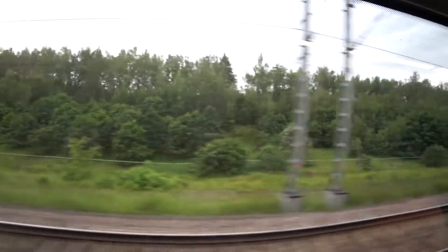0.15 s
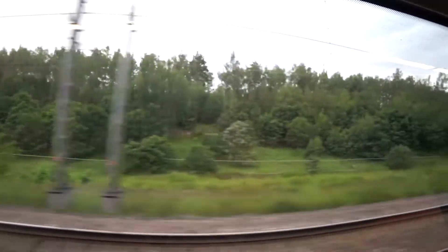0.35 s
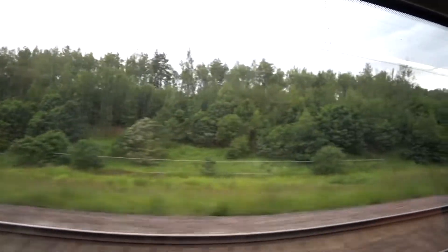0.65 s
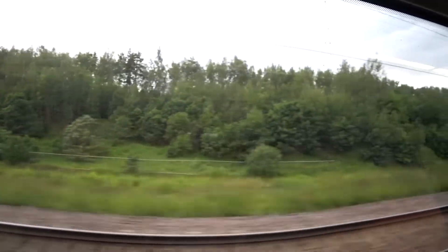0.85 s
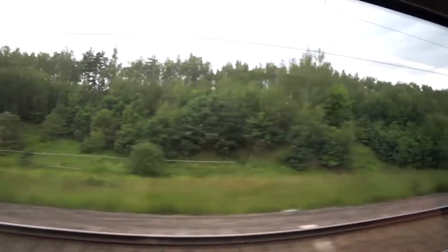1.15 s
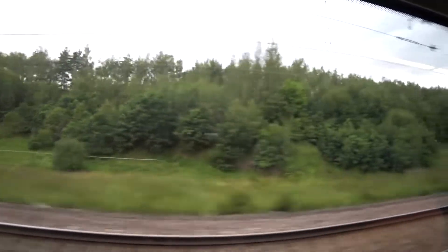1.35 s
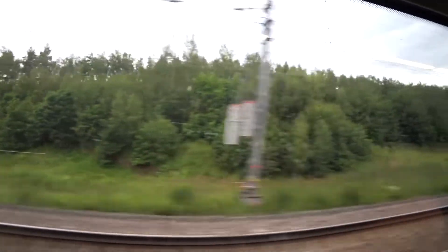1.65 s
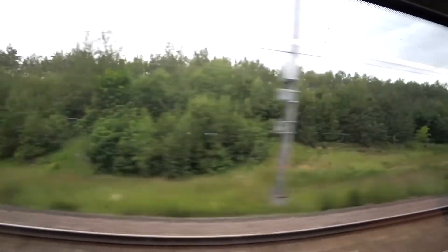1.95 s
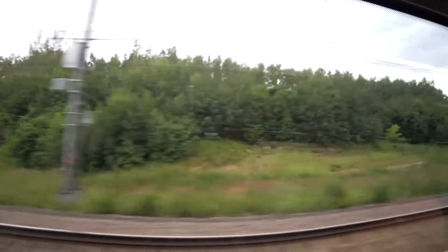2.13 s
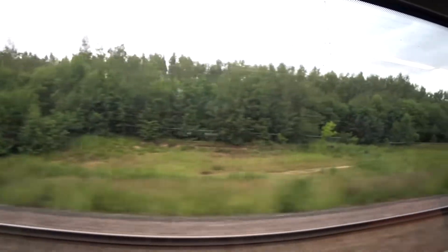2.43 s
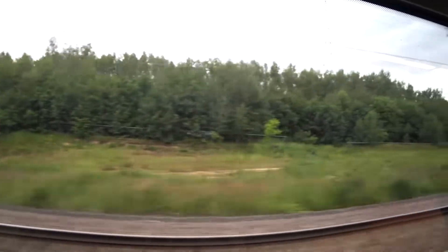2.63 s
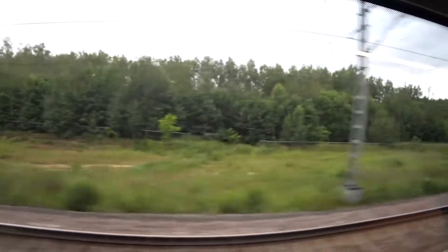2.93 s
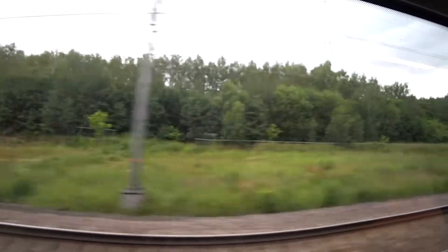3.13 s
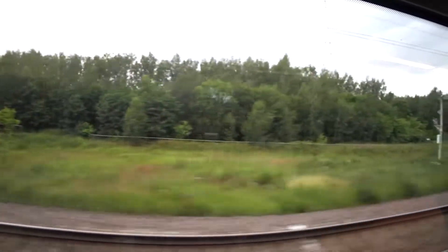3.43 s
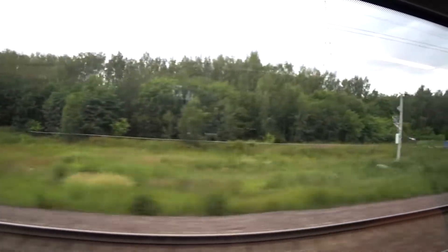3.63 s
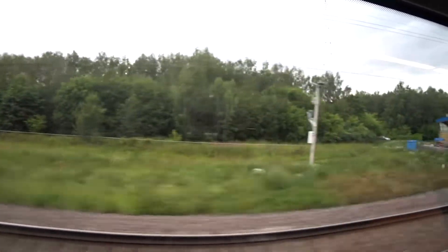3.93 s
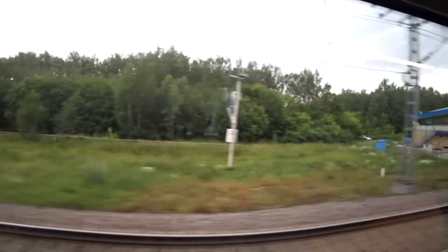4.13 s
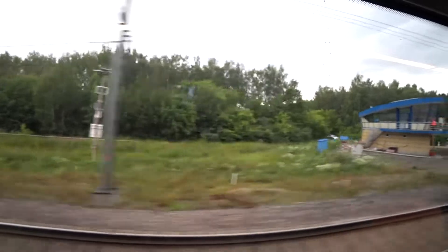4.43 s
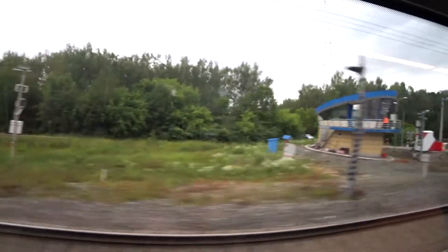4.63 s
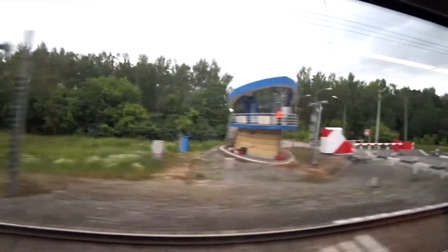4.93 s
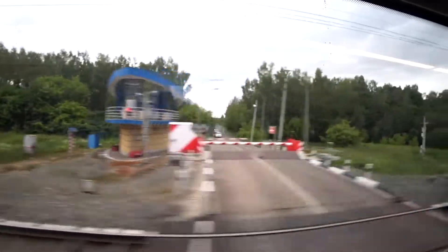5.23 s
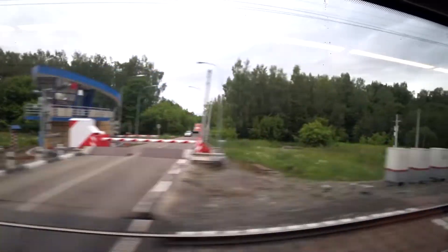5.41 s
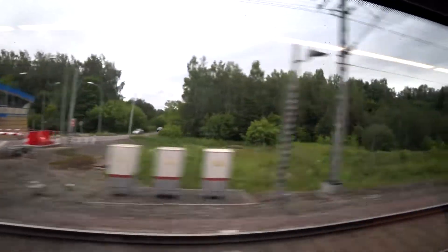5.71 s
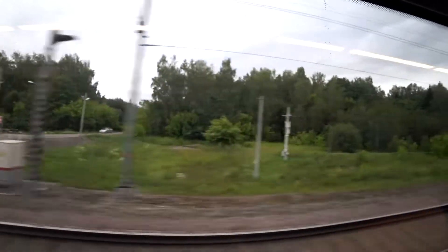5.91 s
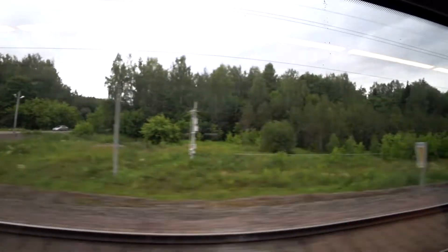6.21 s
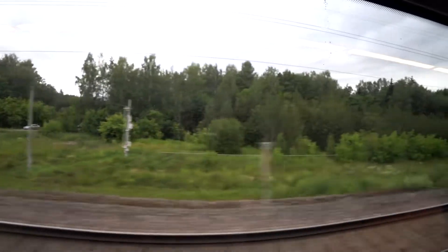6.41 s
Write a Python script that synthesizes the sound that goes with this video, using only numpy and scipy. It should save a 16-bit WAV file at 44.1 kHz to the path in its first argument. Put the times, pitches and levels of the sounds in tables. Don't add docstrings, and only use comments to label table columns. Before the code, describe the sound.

A train runs fast past woods and then a level crossing, heard from the passenger interior. Deep rolling roar and body boom dominate, rising and falling with the rail. Ventilation hisses smoothly, luggage rustles faintly, plastic trim creaks and ticks. Two quick metallic chatters come in the first two seconds; later, from about four seconds, the rumble surges with stronger floor thuds. Close, wide stereo, short interior reverberation.

```python
import sys
import numpy as np
from scipy import signal
from scipy.fft import rfft, irfft, next_fast_len
from scipy.io import wavfile
from scipy.ndimage import uniform_filter1d, map_coordinates

SR = 44100
rng = np.random.default_rng(int(sys.argv[2]) if len(sys.argv) > 2 else 0)


def gain_from_db(level_db):
    decades = np.asarray(level_db, float) / 20
    return 10 ** decades


def transcribe(u):
    v = np.clip(np.atleast_2d(u).T, -1, 1)
    q = np.round(v * 32767).astype(np.int16)
    wavfile.write(sys.argv[1], SR, q)


N = 289283
BURST_T = np.arange(SR // 3) / SR

# frequency in Hz, width in Hz, level in dB.
CABIN_MODES = [(23.7, 13.4, 4), (43, 32, 2), (57.6, 7.6, -4), (68, 14.8, 5)]
# frequency in Hz, width in Hz, level in dB.
SHELL_MODES = [(107.6, 16.2, 0), (131, 30, -2), (176, 51, -6.5), (213.6, 8.4, -7.5)]
# frequency in Hz, width in Hz, level in dB.
FLOOR_MODES = [(254, 57, -19), (297, 55, 1), (345, 26, 2.5), (400, 55, -4)]
# frequency in Hz, width in Hz, level in dB.
SMALL_FLOOR_MODES = [(463, 56, 3), (558, 16, -6), (595, 36, -2.5), (780, 150, -12), (880, 200, -36)]
# frequency in Hz, width in Hz, level in dB.
RAIL_MODES = [(740, 250, -2), (849, 200, -1.5), (1007, 170, -2), (1130, 280, -6.5), (1460, 520, -12.5)]
# time in seconds, level in dB.
SWAY_LEVEL = [(0.0, -21), (0.51, -24.5), (1.55, -20), (1.59, -31), (1.64, -15.5), (1.77, -23),
              (2.56, -20.5), (2.72, -22), (3.51, -23.5), (3.65, -25), (4.16, -23.5), (4.35, -17),
              (4.51, -25.5), (4.53, -20), (5.17, -20.5), (5.24, -19.5), (5.26, -19), (6.56, -19)]
SMOOTH_DB = -41
# centre in seconds, level in dB, length in seconds,
# long ripples in dB, short ripples in dB.
ROUGH_PATCHES = [(0.07, -50.5, 0.49, 7, 2), (0.517, -39.5, .12, 2, -1), (0.923, -33, 0.079, 0, -6),
                 (1.12, -42, 0.11, 4, -8), (1.337, -36, 0.072, 1, -7), (1.477, -35, 0.03, -.5, -11),
                 (1.539, -31.5, 0.031, -2, -9), (1.634, -36.5, 0.05, 3, -6), (1.736, -49, 0.022, 7.5, -6),
                 (2.07, -39, 0.083, -0.5, -1), (2.235, -42, 0.091, -5, -1), (2.49, -45, 0.06, 3.5, 7),
                 (2.6, -37.5, 0.051, -6, 0), (2.72, -40, 0.21, 0.5, 1.5), (2.85, -51, .06, 5, -1),
                 (3.163, -38, 0.09, 2.5, -4), (3.477, -42, 0.24, 0, 2.5), (3.783, -34.5, .1, -8, -0.5),
                 (3.916, -35, .1, -5.5, -1), (4.054, -37, 0.13, -6.5, -1), (4.147, -34.5, 0.038, 2.5, 3.5),
                 (4.305, -28.5, 0.098, 0.5, 2.5), (4.577, -32, 0.12, 0, 0), (4.684, -26, 0.16, -1, -2),
                 (4.798, -34, 0.031, -1, -5), (4.952, -27, 0.12, 1, -1.5), (5.134, -32.5, 0.028, -1.5, 1),
                 (5.23, -26.5, 0.1, 1, -5), (5.385, -27, 0.12, -0.5, -1.5), (5.523, -32.5, 0.068, -2, 1),
                 (5.717, -31, 0.099, 1, -1.5), (5.817, -25.5, 0.16, -0.5, -9), (5.954, -33, 0.12, 1.5, -6),
                 (6.1, -32, 0.08, 4, -2), (6.25, -30, 0.11, 0.5, 0), (6.5, -33.5, 0.24, 3.5, -6)]
# time in seconds, level in dB.
VENT_LEVEL = [(0.0, -52.5), (0.8, -53), (1.28, -53), (1.97, -53), (2.59, -51.5), (2.9, -53), (3.21, -53.5),
              (3.6, -50), (4.66, -52), (4.79, -50.5), (5.46, -51), (6.56, -52.5)]
# frequency in Hz, level per Hz in dB.
VENT_COLOUR = [(700, -26), (1300, 4), (1650, 1), (2200, -3.5), (3000, -6), (3900, -6.5), (4800, -14),
               (6000, -24), (7500, -36), (11000, -62)]
# frequency in Hz, width in Hz, level in dB.
FAN_LINES = [(810, 9.2, -2.5), (1113, 10, -4.5), (2654, 13, -17), (3240, 4.6, -37)]
# centre in seconds, level in dB, length in seconds.
LUGGAGE_SHIFTS = [(.45, -66.5, 0.33), (2.4, -66, 0.15), (2.64, -54.5, 0.14), (3.4, -64.5, 0.29),
                  (3.92, -57, 0.21), (4.15, -69, 0.092), (4.33, -55, 0.19), (4.7, -62, 0.16),
                  (4.86, -54, 0.25), (5.4, -59.5, 0.18), (2.15, -65.5, 0.28), (5.9, -65.5, 0.5),
                  (6.1, -63, 0.18), (6.45, -58, .2)]
# frequency in Hz, level per Hz in dB.
RUSTLE_COLOUR = [(2500, -27), (4500, 1), (5600, -2), (6900, 1), (7900, -5), (9000, -7), (10200, -6.5),
                 (11500, -10.5)]
# centre in seconds, level in dB, frequency in Hz, length in seconds.
MODE_HUMS = [(0.076, -14, 22.07, 0.36), (0.352, -18.5, 22.95, 0.17), (0.893, -29.5, 340, 0.038),
             (0.97, -32, 463, 0.03), (1.086, -30, 365.4, 0.029), (1.586, -35, 347, 0.076),
             (2.023, -38, 805, 0.032), (2.102, -30, 345, 0.062), (1.66, -17, 63.2, 0.13),
             (3.462, -16.5, 41.85, 0.18), (4.856, -11, 68, 0.052), (5.342, -11.5, 67.9, 0.077),
             (5.927, -18.5, 131.3, 0.3), (6.03, -21, 68, 0.47), (5.951, -20.5, 453, 0.022),
             (6.373, -13.5, 131, 0.025), (6.47, -31, 336.8, 0.49), (0.083, -24, 181, 0.046),
             (0.644, -41, 561, 0.031), (0.908, -39.5, 205, 0.046), (1.549, -35, 450, .025),
             (1.784, -31.5, 190.5, 0.24), (4.39, -20, 149, 0.051), (5.03, -28, 347, 0.036),
             (5.744, -25, 199.4, 0.086)]
# start in seconds, peak in dB, top part in dB, T60 in seconds.
TRIM_SLIPS = [(.8594, -56, -14.5, 0.11), (2.4104, -45.5, -6, 0.12), (2.4698, -46.5, -3.5, 0.17),
              (2.509, -33.5, -9, .13), (3.1094, -49, -33, 0.11), (3.2819, -48.5, -6, 0.068),
              (3.381, -37, -6, 0.051), (3.388, -31.5, -9.5, 0.065), (3.4, -40, -11, 0.09),
              (3.548, -37, -7, 0.11), (3.7698, -43, -31, 0.11), (4.1084, -52, -1, .18),
              (4.3485, -40, -11, 0.05), (4.809, -41, -30, 0.051), (4.853, -36, -12, 0.11),
              (5.5303, -46, -30, .17), (6.4244, -45.5, -6, 0.079)]
# start in seconds, peak in dB, top part in dB, T60 in seconds.
STRAP_SLIPS = [(.182, -42.5, -11, 0.15), (.4594, -49, -6, 0.15), (1.4311, -47, -22, 0.065),
               (1.5459, -43.5, -14, 0.11), (2.795, -46.5, -19, 0.098), (3.4144, -44, -18, .097),
               (3.6994, -47, -34, 0.056), (3.9724, -35.5, -10, 0.072), (3.9914, -53, -15, 0.12),
               (4.1969, -41, -9, 0.059), (4.2423, -42, -12, 0.17), (4.369, -34.5, -11, 0.11),
               (4.9866, -45, -2, 0.12), (5.2021, -43, -4, 0.12), (5.2939, -46, -26, .12),
               (5.437, -38, -7.5, 0.056)]
# start in seconds, peak in dB, top part in dB, T60 in seconds.
PANEL_SLIPS = [
    (.9193, -57, -41, 0.078),
    (1.9445, -50, -8, 0.23),
    (2.348, -43.5, -22, 0.055),
    (4.6463, -44, -11, 0.36),
    (5.0878, -46, -27, 0.15),
    (5.7568, -54, -20, .14),
    (6.2253, -37, -17, 0.043),
    (6.236, -38, -18, .08),
    (6.2464, -48, -18, 0.14),
]
TRIM_LOW_DB, STRAP_LOW_DB, PANEL_LOW_DB = 3, -0.5, 9.5
# start in seconds, level in dB, frequency in Hz, T60 in seconds.
PART_TICKS = [(.182, -44, 6940, 0.075), (.422, -48, 4360, .02), (.528, -43.5, 3800, .02),
              (2.322, -57, 7100, .03), (4.11, -41.5, 3600, .02), (4.482, -51, 7030, 0.066),
              (4.745, -41, 4000, 0.065), (4.812, -41, 5470, 0.02), (4.815, -44, 2960, 0.078),
              (4.991, -47, 3260, 0.047), (5.24, -37, 3760, 0.02), (5.314, -41, 4730, .02),
              (5.358, -56, 8400, 0.077), (5.392, -70, 8460, .07), (5.555, -54, 3700, .03),
              (5.757, -43, 3670, .018), (5.828, -53, 5000, .018), (5.84, -59, 8300, .12),
              (6.353, -37.5, 3900, .018)]
# start in seconds, level in dB, small panels in dB, T60 in seconds.
RAIL_DIPS = [(.637, -42, -3, 0.065), (.9, -38, -3, 0.11), (.92, -35.5, -1, 0.13), (1.455, -33, -10, 0.12),
             (1.536, -28, -5, .1), (2.039, -36.5, -8, .1), (2.599, -43, 0, 0.078), (4.196, -40, 3, 0.048),
             (4.291, -30, 7, 0.077), (4.541, -32, 0, .1), (4.635, -40, 1, 0.1), (4.729, -37, -3, .1),
             (5.031, -41, -6, .08), (5.199, -37, 0, 0.093), (5.674, -39, 0, 0.065), (5.78, -31, 7, 0.089),
             (5.937, -30, 4, 0.085), (6.269, -24, 3, 0.072)]
# start in seconds, level in dB, brightness in dB.
FITTING_CONTACTS = [(1.195, -40.5, 2), (1.208, -49, 7), (1.219, -39, 5), (1.231, -39, 4.5), (1.243, -47, 6),
                    (1.262, -52, 0), (1.669, -35, 0), (1.684, -32, 1), (1.7, -49, 0), (1.721, -49, 5),
                    (1.745, -52, 0)]
# start in seconds, level in dB, frequency in Hz, T60 in seconds.
FITTING_NOTES = [(1.197, -57, 3900, .06), (1.212, -54, 7200, .07), (1.218, -51, 2560, .08),
                 (1.221, -53, 6730, .2), (1.225, -52, 5080, .2), (1.229, -44, 3220, .12),
                 (1.232, -48, 2030, .06), (1.255, -59, 5150, .2), (1.669, -40, 2520, .1),
                 (1.671, -36, 3420, .07), (1.682, -54, 8250, .08), (1.682, -34, 2070, 0.096),
                 (1.684, -33.5, 2543, 0.066), (1.684, -37, 3180, 0.13), (1.684, -54, 6530, .06),
                 (1.693, -52, 5130, .12), (1.7, -44, 3200, .12), (1.718, -47.5, 2500, 0.19),
                 (1.722, -44, 3200, 0.15)]
# frequency in Hz, width in Hz, level in dB.
FITTING_LOW_MODES = [(1750, 300, -4), (2040, 240, -4), (2500, 390, -1), (2840, 300, -6), (3200, 300, -2),
                     (3500, 330, -6), (4050, 440, -11), (4570, 360, -21)]
# frequency in Hz, width in Hz, level in dB.
FITTING_HIGH_MODES = [(5000, 170, 3), (5700, 500, -5), (6620, 120, -1.5), (7200, 250, -5), (8150, 360, -8),
                      (9500, 600, -16)]
# frequency in Hz, T60 in seconds.
CAR_DECAY = [(1000, 0.41), (4000, 0.54), (10000, 0.4)]
# frequency in Hz, likeness from 0 to 1.
LIKENESS = [(25, .99), (150, .98), (270, .87), (500, .8), (850, .55), (1400, .64), (2000, .47), (3500, .57),
            (6000, .68), (10000, .54)]
# frequency in Hz, left over right in dB.
PORT_LEAN = [(25, 2.7), (100, 1.5), (400, .3), (900, -1.1), (1400, -2.8), (1800, -.4), (4000, -1.6),
             (10500, -1.8)]
# frequency in Hz, lead of the left in radians.
PORT_LEAD = [(10, .3), (27, .5), (60, .9), (170, 1.5), (420, 1.12), (700, 1.3), (1150, 1.1), (1800, .15),
             (2500, 0)]


def unit(x):
    return x / np.sqrt(np.mean(x ** 2) + 1e-20)


def along(points, hz):
    f, value = np.transpose(points)
    return np.interp(np.log(hz + 1), np.log(f + 1), value)


def level_curve(rows):
    s, db = np.transpose(rows)
    return np.interp(np.arange(N) / SR, s, db)


def wobble(rate):
    knots = rng.standard_normal(int(N * rate / SR) + 4)
    return map_coordinates(knots, [np.arange(N) * rate / SR])


def bell(s, length):
    return np.exp(-2 * ((np.arange(N) / SR - s) / length) ** 2)


def swells(rows, floor_db):
    power = sum(gain_from_db(db) ** 2 * bell(s, length) for s, db, length in rows)
    return 10 * np.log10(gain_from_db(floor_db) ** 2 + power)


def filtered(x, response):
    edge = SR // 8
    size = next_fast_len(N + 2 * edge)
    wide = np.pad(x, [(0, 0), (edge, edge)], "reflect")
    spectrum = rfft(wide, size) * response(np.fft.rfftfreq(size, 1 / SR))
    return irfft(spectrum, size)[:, edge:edge + N]


def modes(rows, order=1, top_hz=20000):
    def gain(hz):
        f = hz + 1e-3
        power = 0
        for centre, width, db in rows:
            peak = f * width / (centre * centre - f * f + 1j * f * width)
            power = power + gain_from_db(db) ** 2 * np.abs(peak) ** (2 * order)
        return np.sqrt(power) / (1 + (hz / top_hz) ** 4)
    return gain


def diffuse(response, patchy_db=0):
    z = signal.stft(rng.standard_normal((2, N)), nperseg=512)[2]
    patches = uniform_filter1d(rng.standard_normal(z.shape[1:]), 6, 0)
    patches = unit(uniform_filter1d(patches, 10, 1))
    pair = signal.istft(z * gain_from_db(patchy_db * patches), nperseg=512)[1][:, :N]

    def mid_side(hz):
        angle = np.arccos(np.clip(along(LIKENESS, hz), -1, 1)) / 2
        return response(hz) * [np.cos(angle), np.sin(angle)]
    mid, side = filtered(pair, mid_side)
    return unit(np.array([mid + side, mid - side]))


def grit(response):
    noise = rng.standard_normal(N) + 0.84 * rng.standard_normal((2, N))
    return unit(filtered(noise, response))


def steadied(x, seconds, share):
    swell = np.abs(uniform_filter1d(np.mean(x ** 2, 0), int(seconds * SR))) + 1e-6
    return unit(x * swell ** (-share / 2))


def puff(db, t60, rise):
    fall = gain_from_db(db - 60 * BURST_T / max(t60, 0.02))
    return fall * (1 - np.exp(-BURST_T / rise)) ** 2


def tone(hz, phase=0):
    return np.sin(2 * np.pi * hz * BURST_T + phase)


def add(track, s, burst):
    track[..., round(s * SR):][..., :burst.shape[-1]] += burst


def roughness(long_share=0, short_share=0):
    rows = [(s, db + long_share * long_db + short_share * short_db, length)
            for s, db, length, long_db, short_db in ROUGH_PATCHES]
    return swells(rows, SMOOTH_DB) - SMOOTH_DB


def rolling():
    sway_db = level_curve(SWAY_LEVEL) + 0.55 + 0.77 * wobble(16)
    boom_db = -28.5 + 0.5 * roughness(long_share=1.9) + 1.58 * wobble(9)
    roll_db = SMOOTH_DB + roughness(long_share=0.36) - 0.46
    drum_db = SMOOTH_DB + roughness(short_share=0.2) - 3.0
    rail_db = -46 + 0.42 * roughness(short_share=2.4) + 0.5 * wobble(5.7)

    air = diffuse(modes(CABIN_MODES, top_hz=93))
    shell = diffuse(modes(SHELL_MODES, top_hz=254))
    floor = diffuse(modes(FLOOR_MODES, top_hz=970), patchy_db=0.66)
    small = diffuse(modes(SMALL_FLOOR_MODES, top_hz=970), patchy_db=1.2)
    rail = diffuse(modes(RAIL_MODES, order=2), patchy_db=1.36)

    roar = gain_from_db(sway_db) * steadied(air, 0.17, share=0.47)
    roar += gain_from_db(boom_db) * steadied(shell, 0.096, share=1.0)
    roar += gain_from_db(roll_db) * steadied(floor, 0.12, share=0.52)
    roar += gain_from_db(drum_db) * steadied(small, 0.15, share=0.6)
    roar += gain_from_db(rail_db) * steadied(rail, 0.069, share=0.6)
    return filtered(roar, lambda hz: 1 / (1 + (hz / 2000) ** 4))


def ventilation():
    air_db = level_curve(VENT_LEVEL) + 4.0 + 0.17 * roughness(short_share=1.7) + 0.45 * wobble(7.8)
    hiss = diffuse(lambda hz: gain_from_db(along(VENT_COLOUR, hz)), patchy_db=0.93)
    return gain_from_db(air_db) * hiss + gain_from_db(-54.5) * diffuse(modes(FAN_LINES, order=2))


def luggage():
    rustle_db = swells(LUGGAGE_SHIFTS, floor_db=-65.5) + 2.0 + 1.7 * wobble(30)
    return gain_from_db(rustle_db) * diffuse(lambda hz: gain_from_db(along(RUSTLE_COLOUR, hz)), patchy_db=-1.5)


def hums():
    t = np.arange(N) / SR
    waver = 1.92 * wobble(8.3)
    out = np.zeros(N)
    for s, db, hz, length in MODE_HUMS:
        out += gain_from_db(db) * bell(s, length) * np.sin(2 * np.pi * hz * t + waver)
    return out


def creaks():
    low, mid, top = np.zeros((3, N + SR))
    parts = (TRIM_SLIPS, TRIM_LOW_DB), (STRAP_SLIPS, STRAP_LOW_DB), (PANEL_SLIPS, PANEL_LOW_DB)
    for slips, low_db in parts:
        for s, db, top_db, t60 in slips:
            body = puff(db - 0.9, t60, rise=0.079 * t60)
            crack = puff(db - 2.5, 0.029, rise=0.0031)
            slip = body + np.roll(crack, int(0.0039 * SR))
            add(low, s - 0.006, slip * gain_from_db(low_db))
            add(mid, s - 0.006, slip)
            add(top, s - 0.006, slip * gain_from_db(top_db))

    def band(hz, width_hz):
        return grit(modes([(hz, width_hz, 0)], order=3))
    out = low[:N] * band(hz=2400, width_hz=4600)
    out += mid[:N] * band(hz=6130, width_hz=3960)
    return out + top[:N] * band(hz=10020, width_hz=2400)


def ticks():
    out = np.zeros(N + SR)
    for s, db, hz, t60 in PART_TICKS:
        note = tone(hz)
        if hz < 4200:
            note += 0.5 * tone(1.23 * hz) + 0.3 * tone(1.56 * hz)
        flutter = np.cos(1.3 * wobble(300)[:len(BURST_T)])
        add(out, s - 0.002, puff(db + 7, t60, rise=0.035 * t60) * note * flutter)
    return out[:N]


def thuds():
    def ring(panels):
        return sum(gain_from_db(db + rng.normal(0, 2)) * tone(hz, 2 * np.pi * rng.random())
                   for hz, width_hz, db in panels)
    out = np.zeros(N + SR)
    for s, db, small_db, t60 in RAIL_DIPS:
        panels = ring(FLOOR_MODES) + gain_from_db(small_db) * ring(SMALL_FLOOR_MODES)
        add(out, s, puff(db + 3, t60, rise=0.0034) * panels)
    return out[:N]


def fitting():
    low, top, notes = np.zeros((3, N + SR))
    for s, db, bright_db in FITTING_CONTACTS:
        add(low, s - 0.003, puff(db + 1.5, 0.095, rise=0.0029))
        add(top, s - 0.003, puff(db + bright_db - 11.0, 0.09, rise=0.0033))
    for s, db, hz, t60 in FITTING_NOTES:
        waver = 1.5 * wobble(111)[:len(BURST_T)]
        add(notes, s - 0.002, puff(db + 4.5, t60, rise=0.0023) * tone(hz, waver))
    scrape = low[:N] * grit(modes(FITTING_LOW_MODES, order=2, top_hz=6030))
    scrape += top[:N] * grit(modes(FITTING_HIGH_MODES))
    return scrape + notes[:N]


def car_tail(x):
    noise = rng.standard_normal(SR // 2) + 2.1 * rng.standard_normal((2, SR // 2))
    hz, t, z = signal.stft(noise, SR, nperseg=256)
    decay = gain_from_db(-60 * t / along(CAR_DECAY, hz)[:, None])
    tail = signal.istft(z * decay, SR, nperseg=256)[1]
    return signal.fftconvolve(x, tail / np.linalg.norm(tail[0]), axes=1)[:, :N]


def scene():
    bed = rolling() + ventilation() + luggage() + hums()
    near = creaks() + ticks() + fitting()
    return bed + thuds() + near + gain_from_db(-12.0) * car_tail(near)


def roll_off(x):
    return signal.sosfilt(signal.butter(12, 11090, fs=SR, output="sos"), x)


def record(dry):
    def ports(hz):
        level = gain_from_db(np.outer([0.5, -0.5], along(PORT_LEAN, hz)))
        phase = np.exp(np.outer([0.5j, -0.5j], along(PORT_LEAD, hz)))
        return level * phase * (hz < 11090)
    return roll_off(filtered(dry, ports))


dry = scene()
out = record(dry)
transcribe(out)
```